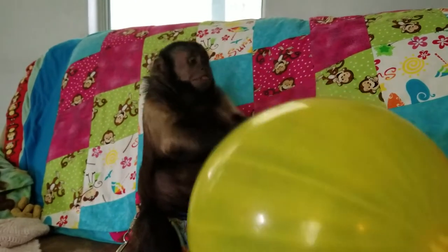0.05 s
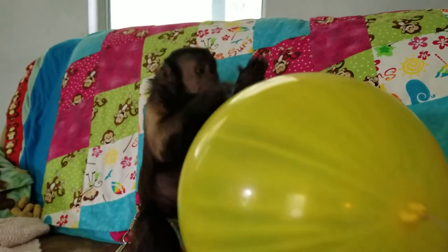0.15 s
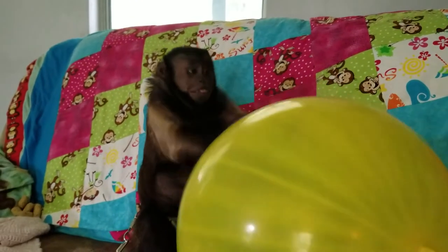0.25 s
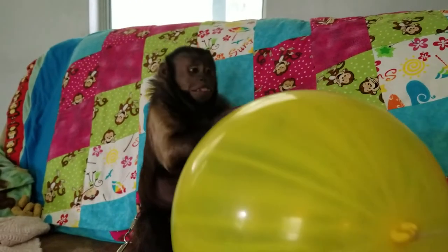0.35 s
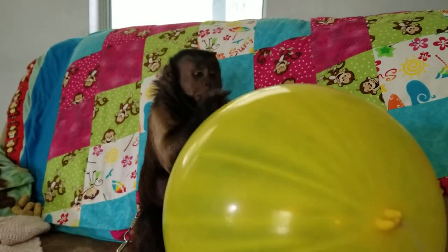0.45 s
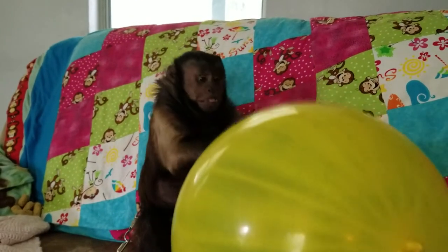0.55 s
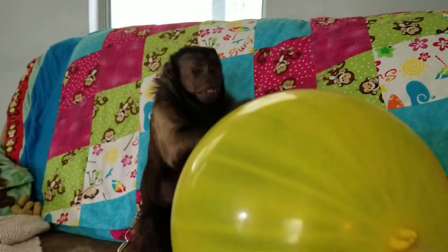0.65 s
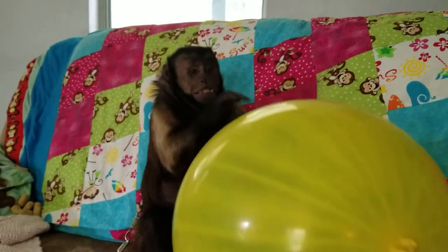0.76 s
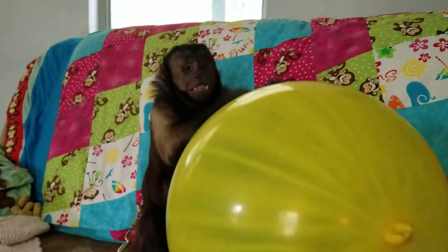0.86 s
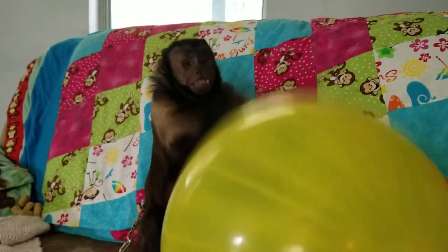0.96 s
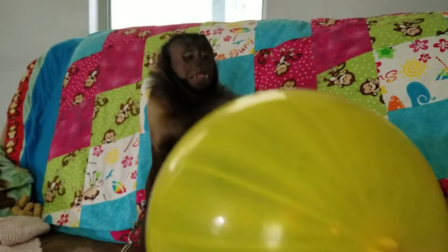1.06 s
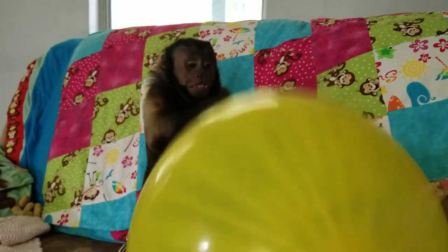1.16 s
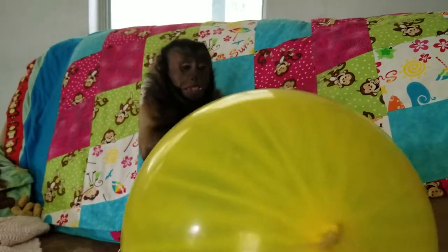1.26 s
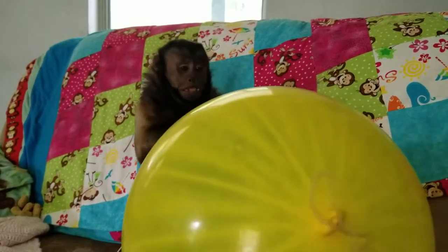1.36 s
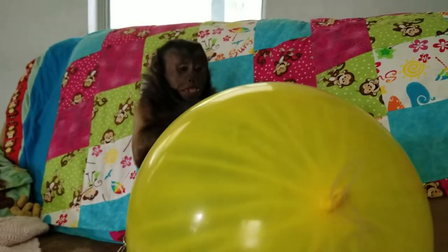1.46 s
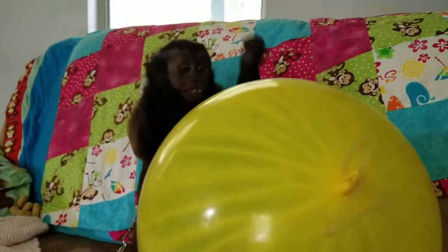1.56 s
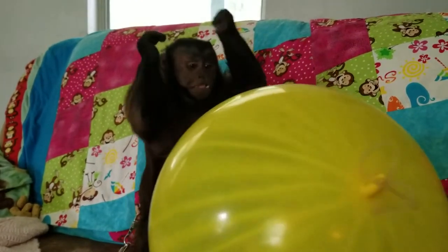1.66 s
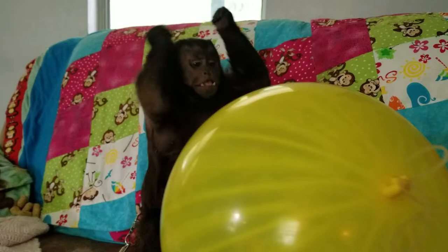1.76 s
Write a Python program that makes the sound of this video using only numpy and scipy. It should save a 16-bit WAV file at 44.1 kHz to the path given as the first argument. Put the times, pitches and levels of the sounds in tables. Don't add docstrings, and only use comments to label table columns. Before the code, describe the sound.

Hands thump and scuff a large taut balloon close by in a quiet, furnished living room.

```python
import sys
import numpy as np
from scipy import signal
from scipy.fft import rfft, irfft
from scipy.io import wavfile
from scipy.ndimage import uniform_filter1d

SR = 44100
rng = np.random.default_rng(int(sys.argv[2]) if len(sys.argv) > 2 else 0)


def invert_db(x):
    u = np.asarray(x, float) / 20
    return 10 ** u


def bounce(signal):
    frames = np.transpose(np.atleast_2d(signal))
    limited = np.clip(frames, -1, 1)
    pcm = np.round(limited * 32767).astype(np.int16)
    wavfile.write(sys.argv[1], SR, pcm)


N = 79380
T = np.arange(N) / SR
F = np.maximum(np.fft.rfftfreq(N, 1 / SR), 1)

# frequency in Hz, density in dB per Hz.
HOUSE_COLOUR = [(40, -10.5), (110, 2.5), (160, -14.5), (260, -11.5), (1100, -7.5), (3300, -10.5),
                (6200, -27), (16000, -40)]
# frequency in Hz, gain in dB.
LOW_MID_DIP = [(120, 0.5), (170, -1), (300, 1), (390, -2), (490, -1), (800, 0)]
# strongest contact in seconds, level in dB, rise in seconds, fall in seconds.
BRUSHES = [(.048, -71, 0.017, .02), (.09, -49, .015, .03), (.221, -54, .003, .015),
           (.265, -43, .003, 0.047), (.36, -52, .002, .006), (.535, -46.5, 0.019, 0.023),
           (.565, -42.5, 0.0089, .03), (.74, -53, 0.011, .03), (.8, -49.5, 0.0088, 0.031),
           (.87, -54, 0.013, .02), (.958, -50, .003, .03), (.995, -44, 0.01, 0.044),
           (1.175, -41, .012, .02), (1.2, -35, 0.019, 0.034), (1.24, -59, .005, .015),
           (1.287, -53, .002, .008), (1.43, -70, .005, .02)]
# frequency in Hz, density in dB per Hz.
FUR_COLOUR = [(3000, -40), (7000, -6.5), (10500, -7.5), (14500, -9)]
# frequency in Hz, density in dB per Hz.
CRUMPLE_COLOUR = [(120, -9), (250, 7.5), (400, -3.5), (560, -0.5), (750, -21.5), (1500, -21), (5000, -65)]
# start in seconds, peak in dB, centre in Hz, ring in seconds.
TICKS = [(.087, -33, 1500, .025), (.095, -36, 1100, .015), (.2735, -29, 3100, .006), (.292, -28, 1000, .01),
         (.313, -32, 1500, .006), (.3602, -32, 800, .015), (.279, -25, 1900, .012), (.276, -27, 700, .02),
         (.284, -28, 1300, .015), (.271, -29, 4800, .01), (.3605, -38, 7000, .005),
         (.5735, -32, 1800, .006), (.9582, -29, 1500, .005), (.9732, -24, 2800, .006),
         (.979, -26, 520, .02), (1.186, -29, 560, .015), (1.188, -22, 2400, .015),
         (1.2395, -27, 4500, .006), (1.215, -27, 3000, .006), (1.2015, -22, 1400, .012),
         (1.2, -24, 680, .03), (1.195, -30, 8400, .006), (1.204, -26, 4000, .006),
         (1.2155, -21, 1500, .006), (1.2385, -23, 950, .016), (1.239, -27, 520, .02),
         (1.2865, -27, 2400, .01), (1.2862, -34, 900, .012)]
# start in seconds, peak in dB, pitch in Hz, ring in seconds.
SNAPS = [
    (.5639, -30, 700, .004),
    (.572, -24, 1100, .003),
    (.9588, -29, 500, .004),
    (1.2855, -22.5, 1500, .003),
    (1.2862, -26, 2700, .006),
    (1.536, -31, 900, .002),
    (1.2857, -30, 600, .008),
]
# strongest contact in seconds, scuff in dB, rise in seconds, fall in seconds,
# rumble in dB.
RUBS = [(0.042, -37.5, 0.019, 0.014, -41.5), (0.089, -42, 0.024, 0.034, -39.5),
        (.15, -62, 0.028, 0.073, -47), (0.23, -35, 0.005, 0.024, -29), (0.277, -29, 0.011, 0.021, -27.5),
        (.314, -43, 0.0034, 0.02, -30), (0.363, -47, 0.0034, 0.055, -41.5),
        (0.527, -41.5, 0.011, 0.03, -39), (0.568, -38, 0.01, 0.031, -31), (.66, -51, 0.036, 0.12, -46.5),
        (.752, -41, 0.011, .04, -35), (0.798, -47, 0.0077, 0.019, -43.5), (.876, -47, 0.012, 0.028, -41.5),
        (0.967, -38.5, 0.0042, 0.042, -26.5), (.992, -33.5, 0.017, 0.017, -33.5),
        (1.07, -53.5, 0.022, 0.11, -48), (1.166, -37, 0.0085, 0.055, -28), (1.191, -44, 0.006, 0.014, -43),
        (1.203, -26, 0.0081, 0.0097, -27.5), (1.217, -31, 0.0045, 0.01, -24.5),
        (1.24, -33, 0.0035, 0.012, -35.5), (1.3, -50.5, 0.029, 0.047, -37.5),
        (1.428, -52, 0.03, 0.073, -53)]
# frequency in Hz, density in dB per Hz.
SCUFF_COLOUR = [(150, -32), (300, -12), (400, -13), (560, -11), (1700, -13.5), (3000, -9.5), (7000, -20),
                (16000, -28.5)]
# frequency in Hz, level in dB, ring in seconds.
BALLOON_MODES = [(48, -2, 0.17), (74.5, -2.5, 0.32), (105.6, -2, 0.154), (134.4, 2.5, 0.041),
                 (180.9, -12, 0.81), (218.6, -3, 0.033), (297.5, -11, 0.057), (493, -5, 0.033),
                 (619, -14, 0.087), (956.5, -13.5, 0.21)]
# start in seconds, peak in dB.
TAPS = [
    (1.429, -43),
    (1.5366, -39),
    (1.5497, -43),
]
# frequency in Hz, level in dB, ring in seconds.
TAP_MODES = [(212.6, 1, 0.068), (344, -13, 0.036), (514, -7, 0.017)]
# start in
# seconds, peak in dB, pitch in Hz, ring in seconds.
PUSHES = [(.014, -38, 110, .04), (.118, -35, 200, .03), (.2255, -23, 115, .04), (.234, -29, 150, .02),
          (.2415, -25, 95, .025), (.2527, -13.5, 150, .035), (.2617, -18, 190, .04), (.52, -31, 140, .025),
          (.5335, -28, 100, .025), (1.06, -34, 70, .1), (.366, -34, 220, .04), (.5725, -22, 58, .045),
          (.609, -30, 90, .03), (.655, -37, 65, .08), (.68, -38, 60, .06), (.7455, -29, 125, .04),
          (.759, -29, 55, .06), (.9598, -22, 105, .04), (.968, -29, 230, .03), (.9772, -14.5, 135, .009),
          (1.004, -28, 260, .03), (1.0055, -31, 550, .04), (1.028, -33, 560, .04), (1.087, -36, 90, .08),
          (1.12, -38, 100, .08), (1.014, -25, 70, .04), (1.045, -30, 95, .07), (1.258, -25, 95, .03),
          (1.151, -32, 90, .03), (1.1787, -10.5, 155, .035), (1.187, -21, 140, .03), (1.196, -20, 75, .05),
          (1.217, -23, 58, .06)]
# start in seconds, peak in dB, pitch in Hz, ring in seconds.
RELEASES = [(.028, -34, 130, .03), (.0365, -29, 215, .05), (.0455, -29, 230, .04), (.059, -31, 75, .04),
            (.132, -31, 105, .02), (.2497, -21, 170, .012), (.2765, -20, 100, .04), (.3075, -25, 95, .025),
            (.339, -31, 110, .04), (.376, -35, 90, .05), (.603, -30, 100, .03), (.9745, -23, 200, .01),
            (.9862, -23, 110, .012), (.995, -30, 330, .04), (1.029, -21, 120, .025),
            (1.158, -23, 160, .035), (1.165, -32, 200, .03), (.5238, -31, 160, .012),
            (.538, -31, 130, .015), (.5655, -31, 300, .015), (.2845, -25, 190, .012), (1.252, -26, 75, .04),
            (1.306, -32, 105, .08), (1.385, -37, 80, .04)]

PUSH_CYCLES = 0.12
PORT_LAG_S, LEFT_DB = 0.00006, 1.45
LOW_LAG_S, LOW_LEFT_DB = 0.00002, 1.2
SCUFF_WIDE, TONE_WIDE, WIDE_FROM_HZ = 0.73, 0.94, 300


def unit(x):
    return x / np.sqrt(np.mean(x ** 2))


def colour(x, table):
    hz, db = np.array(table).T
    gain = invert_db(np.interp(np.log(F), np.log(hz), db))
    return irfft(rfft(x) * gain, N)


def ring(x, hz, t60):
    pole = np.exp(2j * np.pi * hz / SR - np.log(1000) / (t60 * SR))
    return signal.lfilter([1], [1, -pole], x).imag


def walk(rate):
    k = int(SR / rate)
    smooth = uniform_filter1d(rng.standard_normal(N), k)
    return unit(uniform_filter1d(smooth, k))


def ports(x, lag_s, left_db):
    late = irfft(rfft(x) * np.exp(-2j * np.pi * F * lag_s), N)
    return np.array([x * invert_db(left_db / 2), late * invert_db(-left_db / 2)])


def wide(shared, separate, share):
    apart = share * F ** 2 / (F ** 2 + WIDE_FROM_HZ ** 2)
    return irfft(rfft(shared) * np.sqrt(1 - apart) + rfft(separate) * np.sqrt(apart), N)


def blow(s, db, hz, t60, rise):
    u = np.maximum(T - s, 0)
    envelope = (1 - np.exp(-u / rise)) * np.exp(-np.log(1000) * u / t60)
    swing = envelope * np.sin(2 * np.pi * hz * u)
    return invert_db(db) * swing / np.max(swing)


def contact(rows, column):
    power = np.zeros(N)
    for row in rows:
        u = T - row[0]
        swell = np.exp(-(u / row[2]) ** 2)
        fade = np.exp(-2 * np.abs(u) / row[3])
        power += invert_db(row[column]) ** 2 * np.where(u < 0, swell, fade)
    return np.sqrt(power)


def balloon(x):
    return sum(invert_db(db) * ring(x, hz, t60) / np.sqrt(t60) for hz, db, t60 in BALLOON_MODES)


def room_tone():
    shared = rng.standard_normal(N)
    separate = rng.standard_normal((2, N))
    hiss = unit(colour(wide(np.array([shared, shared]), separate, TONE_WIDE), HOUSE_COLOUR))
    hiss = hiss * invert_db(-48 + walk(11) / 2)
    hum_hz, hum_width_hz = 113, 23
    hum = unit(ring(rng.standard_normal(N), hum_hz, np.log(1000) / np.pi / hum_width_hz))
    return hiss + invert_db(-84) * hum


def echo(x):
    t60_s, level_db = 0.29, -15.5
    u = T[:SR // 2]
    tail = rng.standard_normal((2, len(u))) * np.exp(-np.log(1000) * u / t60_s) * (u > 0.004)
    tail = signal.lfilter(*signal.butter(1, [160, 4760], "band", fs=SR), tail)
    tail[1] = 0.64 * tail[0] + 1.13 * tail[1]
    tail = tail / np.sqrt(np.sum(tail[0] ** 2))
    return invert_db(level_db) * signal.fftconvolve(x, tail, axes=1)[:, :N]


def fur():
    shared = ports(rng.standard_normal(N), PORT_LAG_S, LEFT_DB)
    separate = rng.standard_normal((2, N))
    hiss = unit(colour(wide(shared, separate, SCUFF_WIDE), FUR_COLOUR))
    return hiss * contact(BRUSHES, column=1)


def crumple():
    creases_per_s = 350
    pops = (rng.random(N) < creases_per_s / SR) * rng.standard_normal(N)
    return invert_db(-9) * unit(colour(pops, CRUMPLE_COLOUR)) * contact(RUBS, column=4)


def ticks():
    out, noise = np.zeros(N), rng.standard_normal(N)
    for s, db, hz, t60 in TICKS:
        u = np.maximum(T - s, 0)
        burst = (T >= s) * np.exp(-np.log(1000) * u / t60) * noise
        crack = ring(burst, hz, 6.5 / hz)
        out += invert_db(db) * crack / np.max(np.abs(crack))
    return out


def snaps():
    return -sum(blow(s, db, hz, t60, PUSH_CYCLES / hz) for s, db, hz, t60 in SNAPS)


def latex_slips():
    grains_per_s, spread_db, grain_share = 5000, 1.5, 0.45
    slipping = rng.random(N) < grains_per_s / SR
    size = invert_db(spread_db * rng.exponential(size=N))
    grains = unit(slipping * size * np.sign(rng.standard_normal(N)))
    mix = np.sqrt(grain_share) * grains + np.sqrt(1 - grain_share) * rng.standard_normal(N)
    return unit(colour(mix, SCUFF_COLOUR))


def scuff():
    shared = ports(latex_slips(), PORT_LAG_S, LEFT_DB)
    separate = np.array([latex_slips() * invert_db(LEFT_DB / 2), latex_slips() * invert_db(-LEFT_DB / 2)])
    flutter = invert_db(1.2 * walk(110))
    return wide(shared, separate, SCUFF_WIDE) * contact(RUBS, column=1) * flutter


def rumble():
    drag = rng.standard_normal(N) * invert_db(2.5 * walk(58))
    return balloon(drag * contact(RUBS, column=4)) / np.std(balloon(drag))


def thumps():
    push = np.zeros(N)
    for way, rows in ((0.9, PUSHES), (-0.88, RELEASES)):
        for s, db, hz, t60 in rows:
            push += way * blow(s, db, hz, t60, PUSH_CYCLES / hz)
    after = balloon(push)
    after *= np.std(push) / np.std(after)
    taps = np.zeros(N)
    for s, db in TAPS:
        for hz, mode_db, t60 in TAP_MODES:
            taps += blow(s, db + mode_db, hz, t60, rise=0.001)
    return push + invert_db(-14) * after + taps


def scene():
    near = ports(thumps() + rumble(), LOW_LAG_S, LOW_LEFT_DB)
    near = near + scuff()
    near = near + ports(ticks() + snaps(), 0.0001, 2.5)
    house = room_tone()
    near = near + ports(crumple(), LOW_LAG_S, LOW_LEFT_DB)
    heard = near + echo(near) + house + fur()
    return heard + invert_db(-11) * rumble() * np.array([[1], [-1]])


def band_limit(x):
    return signal.sosfilt(signal.butter(12, 15850, fs=SR, output="sos"), x)


def record(dry):
    heard = colour(dry, LOW_MID_DIP)
    heard = signal.lfilter(*signal.butter(1, 24, "high", fs=SR), heard)
    heard = signal.sosfilt(signal.ellip(10, 0.3, 80, 15760, fs=SR, output="sos"), heard)
    return band_limit(heard)


dry = scene()
out = record(dry)
bounce(out)
```